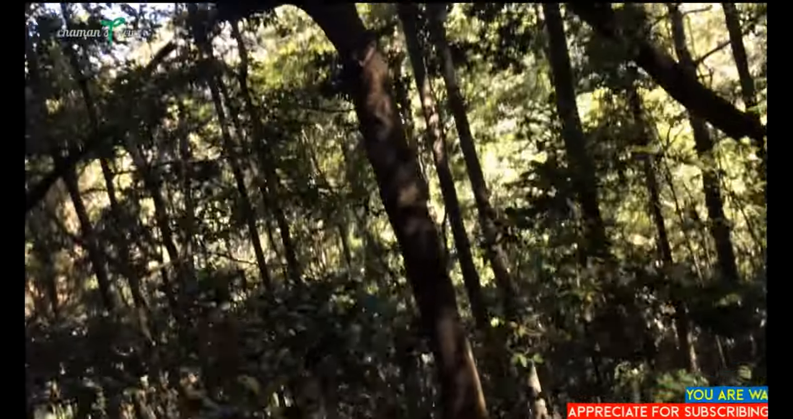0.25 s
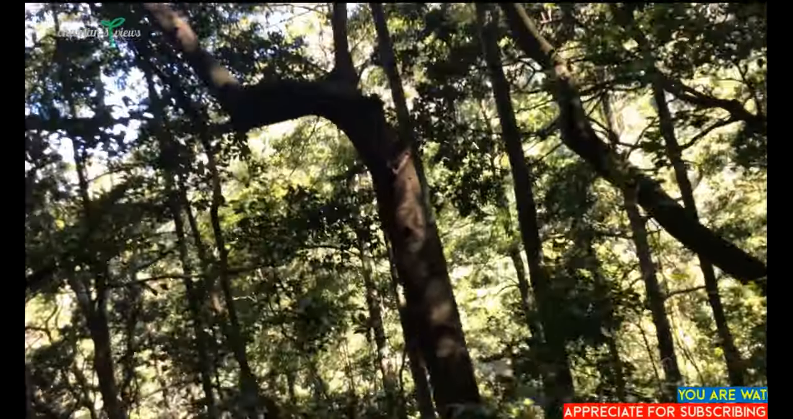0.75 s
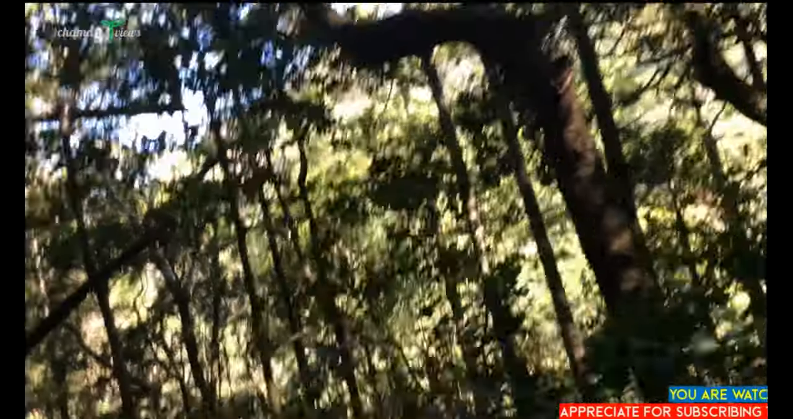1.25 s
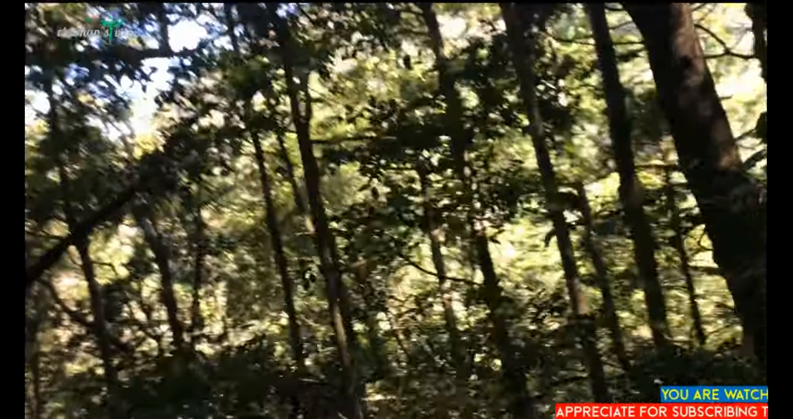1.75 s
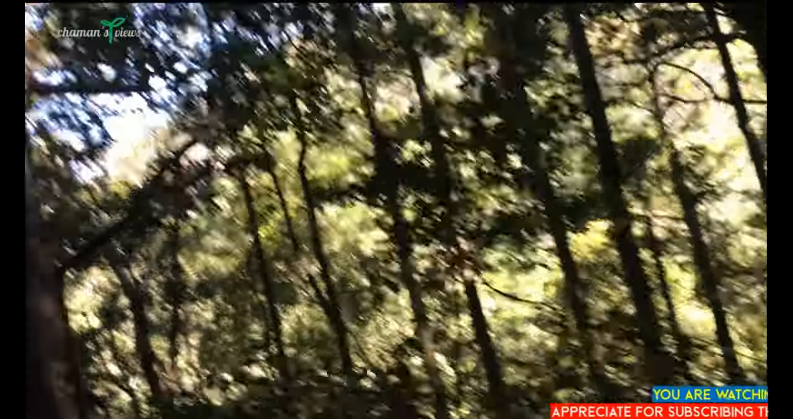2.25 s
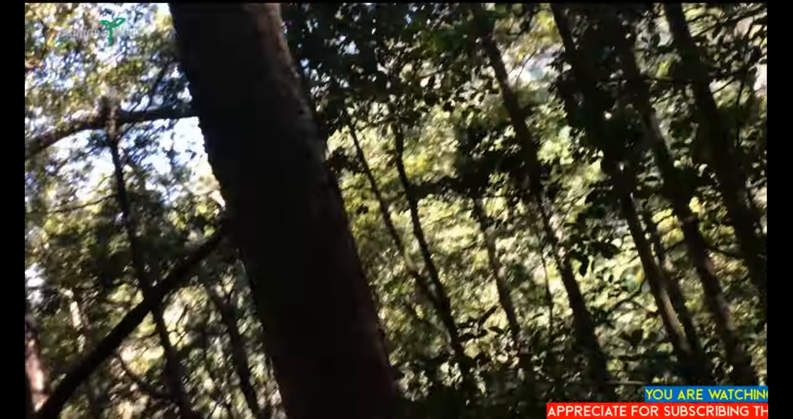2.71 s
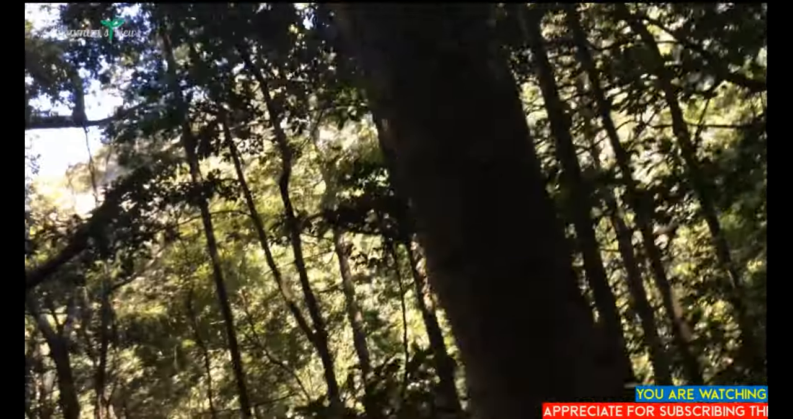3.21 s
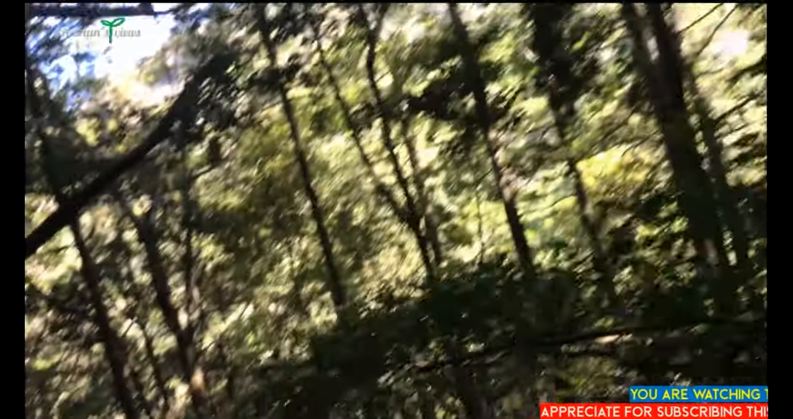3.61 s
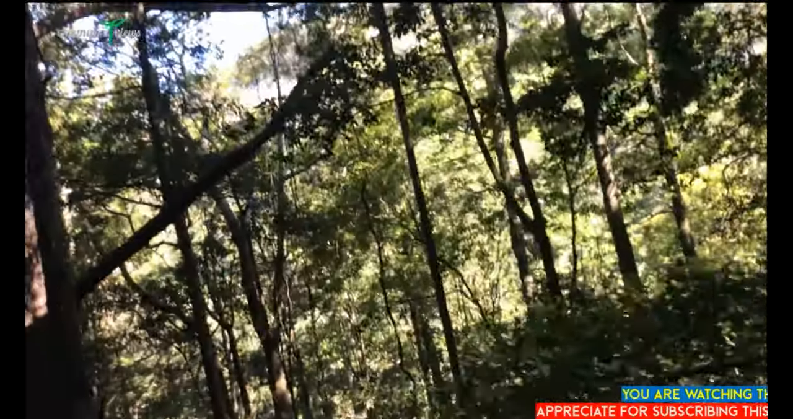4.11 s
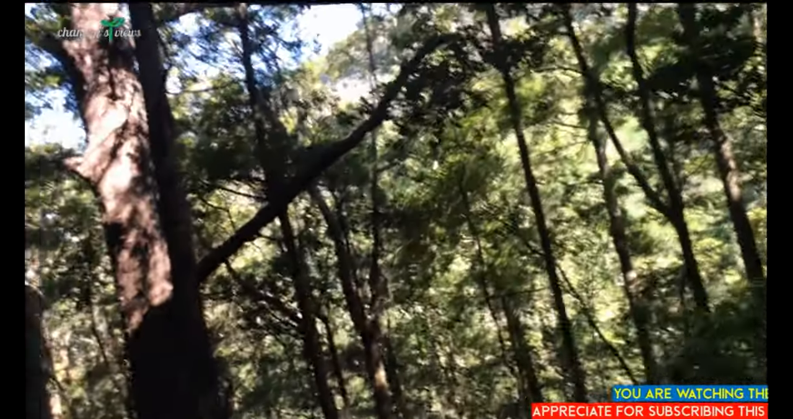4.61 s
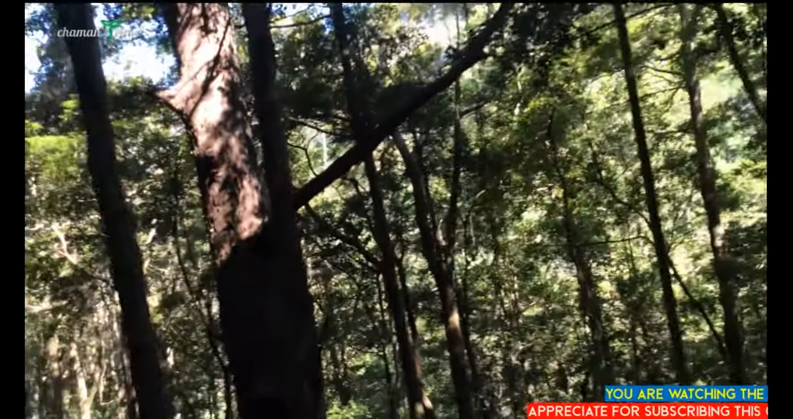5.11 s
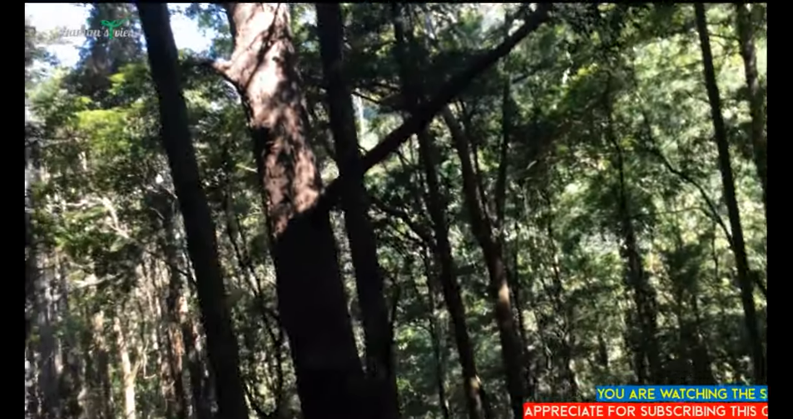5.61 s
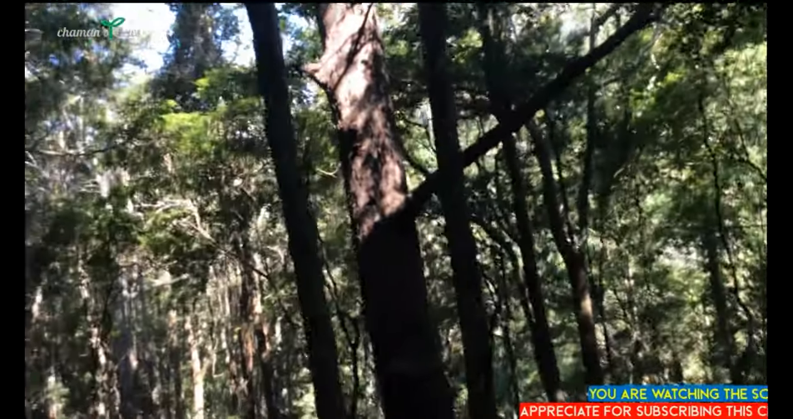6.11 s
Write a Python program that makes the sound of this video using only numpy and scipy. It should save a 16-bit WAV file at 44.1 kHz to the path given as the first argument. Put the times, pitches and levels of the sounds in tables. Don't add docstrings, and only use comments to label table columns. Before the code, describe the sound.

Hundreds of cicadas sing together in a sunlit forest, a continuous bright hiss that dominates everything and swells slightly towards the end. A deeper, distant kind drones faintly beneath. Very soft coos hide in the leaves early on. Around the four-second mark a breeze bumps the handheld microphone with a dull thump, followed by small ticks and a tiny twig scrape. A faint low hush lies below.

```python
import sys
import numpy as np
from scipy import signal
from scipy.fft import rfft, irfft, next_fast_len
from scipy.io import wavfile
from scipy.ndimage import uniform_filter1d, map_coordinates

SR = 44100
rng = np.random.default_rng(int(sys.argv[2]) if len(sys.argv) > 2 else 0)


def attenuation_scalar(level_db):
    decades = np.asarray(level_db, float) / 20
    return 10 ** decades


def put_to_file(sound):
    columns = np.atleast_2d(sound).T
    safe = np.clip(columns, -1, 1)
    whole_steps = np.round(safe * 32767)
    wavfile.write(sys.argv[1], SR, whole_steps.astype(np.int16))


N = 280035

# (level [dB], gain as the camera turns to them [dB], share of the swell [1])
CHOIR_LEVELS = [
    (-36.9, 1.83, 0.31),
    (-31.5, 0.15, 0.99),
    (-32.5, 0.27, .2),
    (-53.5, 5.0, .1),
]
ABDOMEN_HZ = [2860, 3644, 4634, 9180]
# (frequency [Hz], level [dB per Hz])
CHORUS_SPECTRUM = [(1120, -48), (1900, -28.5), (2800, -5), (3100, -5.5), (3400, -3), (3680, 1.7),
                   (4250, -1), (4750, -4.5), (5250, -11), (5550, -12.5), (7000, -26.5), (7950, -25),
                   (10000, -34), (15700, -40)]
# (time [s], level [dB])
CHORUS_SWELL = [(0, -32.5), (.55, -34), (1.2, -32.2), (1.7, -32), (2.15, -32.5), (2.6, -30.5), (3.4, -32),
                (4.0, -31), (4.6, -30), (5.3, -30), (5.9, -29.5), (6.35, -30)]
# (frequency [Hz], level [dB per Hz])
DEEP_SPECTRUM = [(1000, -34), (1300, -15.5), (1450, -5.5), (1650, 2.5), (1800, -4.5), (2000, -10.5),
                 (2500, -25.5)]
# (time [s], peak level [dB], frequency [Hz])
PUFFS = [(0.099, -59, 110), (0.149, -45.5, 59.2), (0.279, -52, 56.5), (0.6, -57, 80), (0.869, -52, 60),
         (0.939, -54, 56.5), (1.169, -55, 118), (1.267, -54, 64.6), (1.659, -56, 129), (1.779, -56, 129),
         (1.917, -55, 56.5), (2.319, -54, 127), (2.538, -56, 129), (2.819, -47, 80.7), (3.166, -54, 66),
         (3.27, -56, 60), (3.368, -44.5, 88.8), (3.529, -58, 56.5), (3.63, -51, 64.6), (3.72, -46, 67),
         (3.769, -55, 129), (3.819, -54, 113), (3.842, -50, 72.7), (3.9, -33.5, 72.7), (3.932, -46, 56.5),
         (4.009, -50, 75.4), (4.059, -54, 91.5), (4.156, -51.5, 78.1)]
# (time [s], level [dB], centre frequency [Hz], length [s])
SCRAPES = [
    (4.6, -53, 1600, 0.0099),
    (5.049, -53, 1300, .007),
    (5.068, -47.5, 1420, .012),
    (5.125, -55, 1200, .008),
    (4.09, -60, 370, .02),
    (1.68, -59, 900, .012),
    (5.75, -64, 700, 0.066),
    (5.76, -68, 72, .08),
    (1.72, -66, 106, .09),
]
# (time [s], peak level [dB])
LEAF_TICKS = [
    (3.9235, -54),
    (4.7576, -49),
    (4.9726, -57),
    (5.0774, -46),
]
# (time [s], level [dB], frequency [Hz], length [s], rise [Hz/s])
SOFT_COOS = [
    (2.95, -63, 810, .04, 0),
    (3.21, -61.5, 815, .07, 0),
    (1.9, -56, 320, .025, 0),
    (0.63, -59, 420, 0.027, 0),
    (1.33, -59, 245, 0.06, 600),
    (1.47, -59, 245, .04, 0),
    (2.45, -61, 330, .03, 0),
    (3.28, -61, 380, .04, 0),
]
# (frequency [Hz], level [dB per Hz])
BREEZE_SPECTRUM = [(15, -31), (30, -5), (60, -1), (90, -4), (150, -21), (300, -42)]
# (time [s], level [dB])
BREEZE_STRENGTH = [(0.0, -71), (0.35, -78), (0.81, -75), (0.96, -83), (1.48, -70.5), (2.19, -75),
                   (2.51, -70), (2.99, -77.5), (3.61, -73), (3.96, -68), (4.19, -76), (4.97, -75),
                   (5.13, -72.5), (5.61, -78), (5.84, -71), (6.35, -77)]
# (frequency [Hz], level [dB per Hz])
HUSH_SPECTRUM = [(60, -30), (120, -1), (250, -0.5), (500, -4.5), (800, -3.5), (1100, -7), (1400, -6),
                 (2500, -24.5)]
# (frequency [Hz], gain [dB])
PORT_COLOUR = [(12300, 0), (13400, -4), (14200, -3), (14700, -4), (15700, -3)]

PAN_S = 3.04
DEEP_DB, DEEP_FADE_DB_PER_S = -53.5, 0.37
PUFF_S, HARD_DB = 0.0077, -36
HUSH_DB, LEAVES_FOLLOW = -61, 0.032
TOP_HZ = 15750


def unit(x):
    return x / np.sqrt(np.mean(x ** 2) + 1e-20)


def along(points, hz):
    f, v = np.transpose(points)
    return np.interp(np.log(hz + 1), np.log(f + 1), v)


def curves(rows):
    s, *cols = np.transpose(rows)
    return [np.interp(np.arange(N) / SR, s, c) for c in cols]


def wobble(rate):
    knots = rng.standard_normal(int(N * rate / SR) + 4)
    return map_coordinates(knots, [np.arange(N) * rate / SR])


def filtered(x, gain):
    m = next_fast_len(N + 8192)
    return unit(irfft(rfft(x, m) * gain(np.fft.rfftfreq(m, 1 / SR)), m)[:N])


def chorus():
    crowd = singers(rate_hz=125, spread=.1, jitter=.25, t60=.15, count=40)
    crowd += 1.11 * rng.standard_normal(N)
    crowd = patchy(crowd, depth_db=1.03)
    swell_db, = curves(CHORUS_SWELL)
    facing = 1 - np.exp(-np.arange(N) / SR / PAN_S)

    def reach(hz):
        log_distance = np.log((hz + 1) / np.array(ABDOMEN_HZ)[:, None])
        return 1 / (1 + (log_distance / 0.11) ** 4)

    out = np.zeros(N)
    for k, (db, turn_db, share) in enumerate(CHOIR_LEVELS):
        voice = filtered(crowd, lambda hz: attenuation_scalar(along(CHORUS_SPECTRUM, hz)) * reach(hz)[k] / reach(hz).sum(0))
        level_db = db + turn_db * facing + share * (swell_db - swell_db.mean())
        out += attenuation_scalar(level_db - 1.04 + 0.12 * wobble(15)) * voice
    return out


def singers(rate_hz, spread, jitter, t60, count):
    m, t = next_fast_len(N + SR // 2), np.arange(SR // 2) / SR
    total = 0
    for _ in range(count):
        period = SR / (rate_hz * (1 + spread * rng.standard_normal()))
        steps = period * np.abs(1 + jitter * rng.standard_normal(2000))
        at = np.cumsum(steps).astype(int)
        clicks = np.bincount(at, attenuation_scalar(3.0 * rng.standard_normal(len(at))), m)[:m]
        path = rng.standard_normal(len(t)) * attenuation_scalar(-60 * t / t60)
        total += rfft(clicks) * rfft(path, m)
    return unit(irfft(total, m)[:N])


def patchy(x, depth_db):
    z = signal.stft(x, nperseg=512)[2]
    field = uniform_filter1d(rng.standard_normal(z.shape), size=4, axis=0)
    field = uniform_filter1d(field, size=5, axis=1)
    return signal.istft(z * attenuation_scalar(depth_db * unit(field)), nperseg=512)[1][:N]


def deep_singers():
    crowd = singers(rate_hz=90, spread=.12, jitter=.3, t60=0.26, count=12)
    crowd += 1.12 * rng.standard_normal(N)
    level_db = DEEP_DB - DEEP_FADE_DB_PER_S * np.arange(N) / SR
    voice = filtered(crowd, lambda hz: attenuation_scalar(along(DEEP_SPECTRUM, hz)))
    return attenuation_scalar(level_db + 0.6 + 0.7 * wobble(11)) * voice


def bumps():
    out, t = np.zeros(N), np.arange(N) / SR
    for s, db, hz in PUFFS:
        late = t - s - .004
        length = PUFF_S / (1 + attenuation_scalar(db - HARD_DB))
        out += attenuation_scalar(db + 1.0) * np.exp(-(late / length) ** 2) * np.cos(2 * np.pi * hz * late + 1.05)
    return out


def scrapes():
    out, t = np.zeros(N), np.arange(N) / SR
    for s, db, hz, length in SCRAPES:
        grit = filtered(rng.standard_normal(N), lambda f: np.exp(-(np.log((f + 1) / hz) / 0.29) ** 2))
        stroke = np.exp(-((t - s) / length) ** 2)
        out += attenuation_scalar(db) * stroke * grit * np.linalg.norm(stroke) / np.linalg.norm(stroke * grit)
    return out


def ticks():
    out, t = np.zeros(N), np.arange(N) / SR
    for s, db in LEAF_TICKS:
        out += attenuation_scalar(db + 2.0) * np.exp(-((t - s) / .0016) ** 2) * np.sin(2 * np.pi * 14300 * t)
    return out


def coos():
    out, t = np.zeros(N), np.arange(N) / SR
    for s, db, hz, length, rise in SOFT_COOS:
        late = t - s
        out += attenuation_scalar(db) * np.exp(-(late / length) ** 2) * np.sin(2 * np.pi * (hz + rise * late / 2) * late)
    return out


def breeze():
    strength_db, = curves(BREEZE_STRENGTH)
    rumble = filtered(rng.standard_normal(N), lambda hz: attenuation_scalar(along(BREEZE_SPECTRUM, hz)))
    return attenuation_scalar(strength_db + 3.0) * unit(attenuation_scalar(2.0 * wobble(9)) * rumble)


def forest_hush():
    strength_db, = curves(BREEZE_STRENGTH)
    level_db = HUSH_DB + LEAVES_FOLLOW * (strength_db - strength_db.mean())
    hush = filtered(rng.standard_normal(N), lambda hz: attenuation_scalar(along(HUSH_SPECTRUM, hz)))
    return attenuation_scalar(level_db + 2.0 + 1.1 * wobble(5)) * hush


def scene():
    mix = chorus() + deep_singers() + bumps() + scrapes() + ticks() + coos() + breeze() + forest_hush()
    return mix[None]


def top_cut(x):
    return signal.sosfilt(signal.butter(12, 15750, fs=SR, output="sos"), x)


def record(dry):
    m = next_fast_len(N)
    hz = np.fft.rfftfreq(m, 1 / SR)
    low_cut = 1 / (1 + (34 / (hz + 1)) ** 4)
    response = attenuation_scalar(along(PORT_COLOUR, hz)) * (hz < TOP_HZ) * low_cut
    mix = irfft(rfft(dry, m) * response, m)[:, :N]
    return top_cut(mix)


dry = scene()
out = record(dry)
put_to_file(out)
```